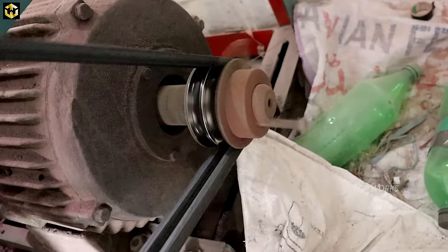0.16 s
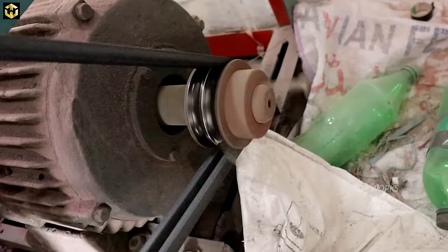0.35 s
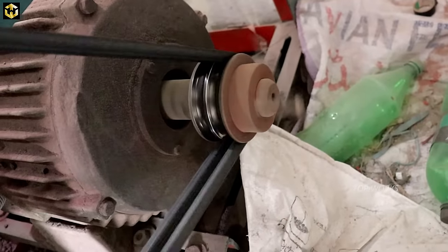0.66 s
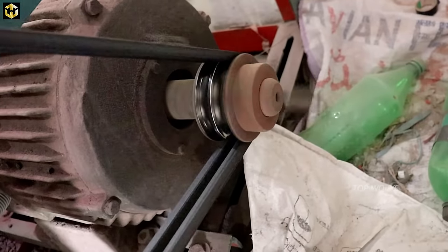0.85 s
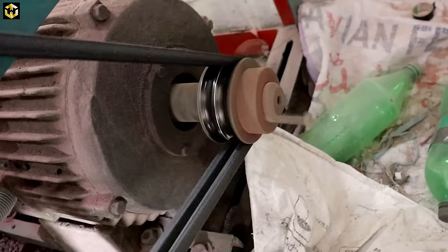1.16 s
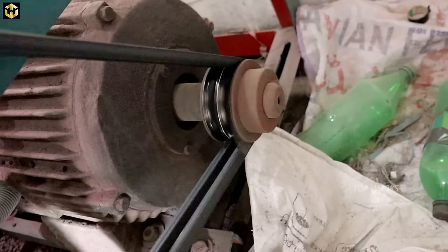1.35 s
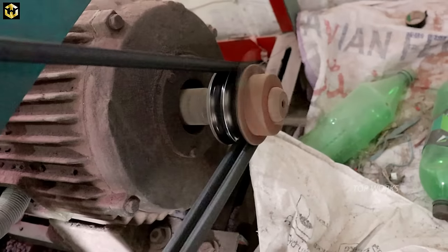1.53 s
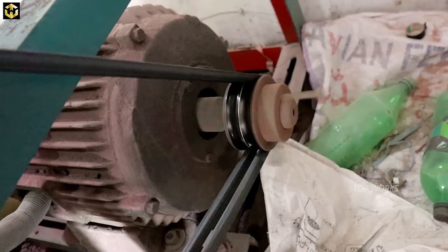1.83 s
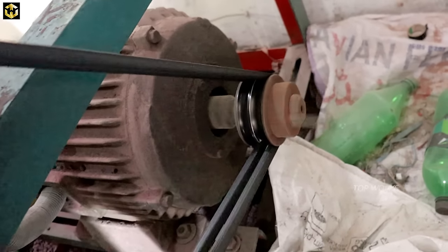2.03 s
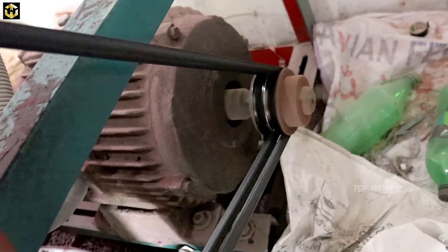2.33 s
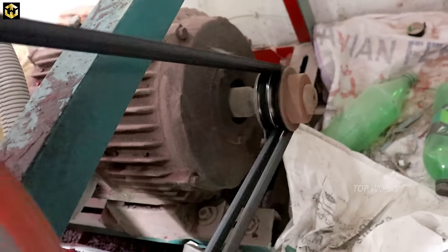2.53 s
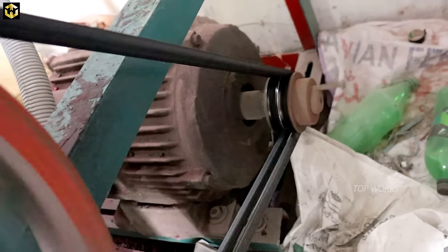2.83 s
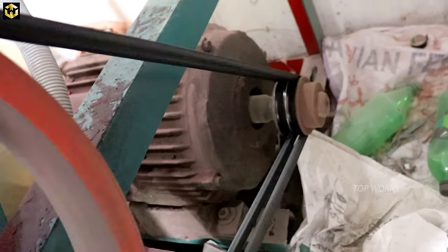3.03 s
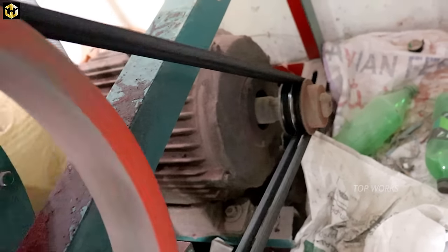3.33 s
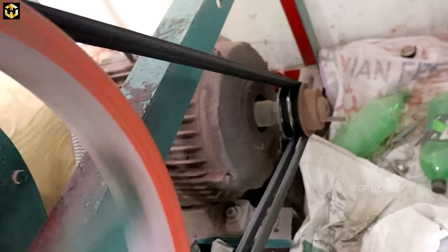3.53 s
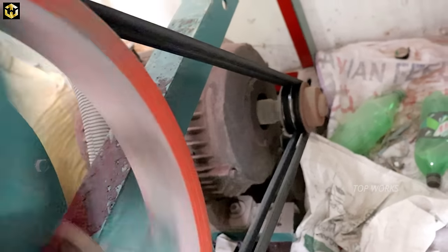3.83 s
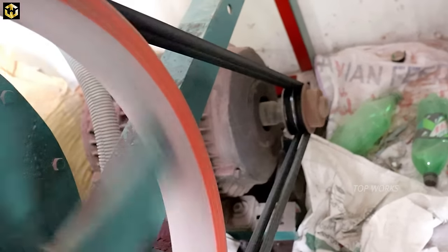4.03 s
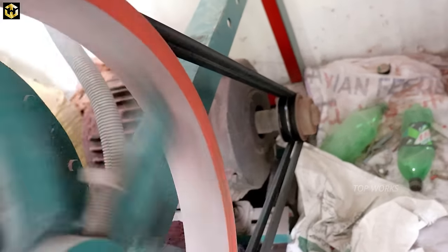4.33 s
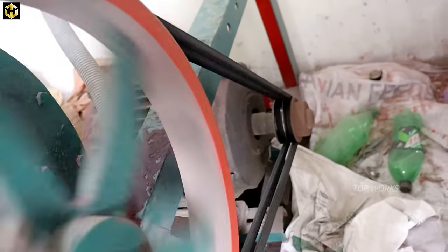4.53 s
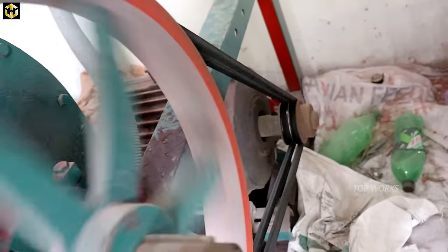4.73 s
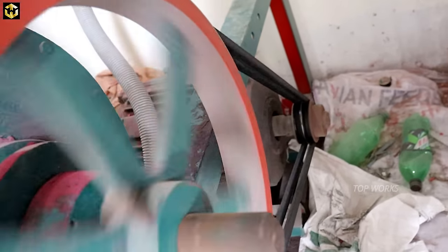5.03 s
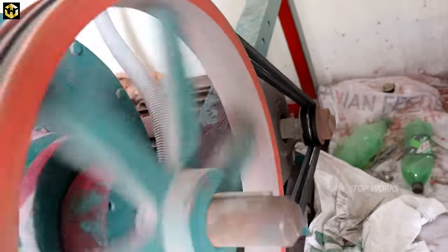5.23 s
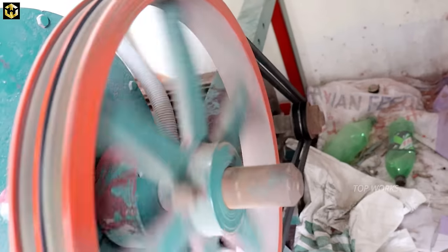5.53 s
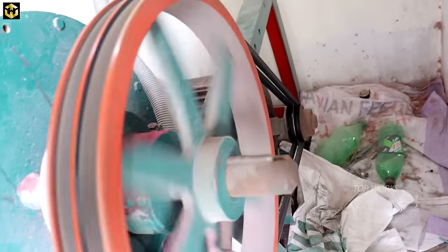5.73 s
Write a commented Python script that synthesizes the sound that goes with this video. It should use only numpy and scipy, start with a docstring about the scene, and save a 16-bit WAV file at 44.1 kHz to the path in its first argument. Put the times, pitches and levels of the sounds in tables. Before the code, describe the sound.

A belt-driven machine runs without pause in a workshop, heard close in wide stereo. It begins loud and throaty: deep throbbing around 80 Hz, low rumble and rushing noise, surging at about 0.3 s, with dull knocks at 0.2 and 0.65 s. A stuttering motor hum stands out near 1 s, then fades by 2.2 s, when a low note softly swells and passes. The din keeps sinking, leaving a faint hollow drone that dips about twice a second, a rough rush ringing near 1.2 kHz and steady rubber hiss. Treble sizzle with faint squeal swells on the left around 3.5 s. Short airy swishes glide up or down throughout, densest from 0.9 to 4 s. Light ticks are scattered between 0.7 and 4.6 s. Three quick dull knocks come at 4.1 s, a fainter one at 4.85 s. By the end the sound is thinner, quieter and centred, with a last swish at 5.8 s.

```python
"""Workshop: an electric motor drives a drum through V-belts; the din sinks over six seconds.
Frame: noise bands throb and rumble under sine hum and a resonant drone. Drum: noise through
housing resonances, roughened by small impacts. Belts: hiss and squealing sizzle.
Brief swishes: noise puffs through gliding resonances. Dull knocks excite low housing modes;
light ticks are decaying noise bursts; one low note swells."""
import sys
import numpy as np
from scipy import signal
from scipy.fft import rfft, irfft
from scipy.io import wavfile
from scipy.ndimage import uniform_filter1d

SR = 44100
rng = np.random.default_rng(int(sys.argv[2]) if len(sys.argv) > 2 else 0)


def wav_out(sig):
    """Save sig, one row per channel (or a flat mono array), as 16-bit PCM at SR to the path in sys.argv[1]."""
    wavfile.write(sys.argv[1], SR, np.round(np.clip(np.atleast_2d(sig).T, -1, 1) * 32767).astype(np.int16))


N = 259308
FRAME, HOP = 2048, 256  # samples
HZ = np.fft.rfftfreq(FRAME, 1 / SR)
FRAME_S = np.arange(N // HOP + 3) * HOP / SR
TIME = np.arange(N) / SR


def amp(db):
    """Decibels to gain."""
    return 10 ** (np.asarray(db) / 20)


def evened(x):
    """Scale to rms 1."""
    return x / np.sqrt(np.mean(x ** 2) + 1e-20)


def curve(table, t=TIME):
    """Join (time_s, value) rows by straight lines."""
    return np.interp(t, *np.transpose(table))


def bell(t, centre_s, length_s):
    """Smooth swell to 1 around centre_s."""
    return np.exp(-((t - centre_s) / length_s) ** 2)


def spectrum(points):
    """Join points on a log-frequency axis; hold the end values."""
    freq_hz, value = np.transpose(points)
    return np.interp(np.log(HZ + 1), np.log(freq_hz), value)


def band(points):
    """Spectrum in dB, falling 30 dB per octave beyond its ends."""
    outside_oct = abs(np.log2((HZ + 1) / np.clip(HZ + 1, points[0][0], points[-1][0])))
    return spectrum(points) - 30 * outside_oct


def blend(early, late):
    """Colour change in dB on the way from the motor to the big pulley."""
    share = np.clip((FRAME_S[:, None] - 1.2) / 2.8, 0, 1)
    return (1 - share) * band(early) + share * band(late)


def lift(resonances):
    """Bell-shaped peaks in dB."""
    return sum(db / (1 + (2 * (HZ - hz) / width_hz) ** 2) for hz, width_hz, db in resonances)


def resonate(x, hz, width_hz):
    """One-pole resonance of gain 1 whose centre follows hz."""
    turn = np.exp(2j * np.pi * np.cumsum(hz * np.ones(x.shape[-1])) / SR)
    r = np.exp(-np.pi * width_hz / SR)
    return 2 * (turn * signal.lfilter([1 - r], [1, -r], x / turn)).real


def panned(x, pan_db):
    """Share sound between left (positive pan_db) and right, keeping its power."""
    gains = np.array([amp(pan_db / 2), amp(-pan_db / 2)]).reshape(2, -1)
    return x * gains / np.sqrt(np.mean(gains ** 2, 0))


def wander(rate_hz):
    """Slow random curve of rms 1: noise low-passed near rate_hz."""
    f = np.fft.rfftfreq(N, 1 / SR)
    return evened(irfft(rfft(rng.standard_normal(N)) / (1 + (f / rate_hz) ** 4), N))


# left-right likeness of noise [freq_hz, likeness (0 to 1)]
LIKENESS = [(60, 0.97), (130, 0.89), (290, 0.71), (450, 0.36), (640, 0.24), (1400, 0.011), (15000, 0.0084)]


def noise(shape_db, patchy_db, ripple_db, size=20):
    """Stereo noise with drifting patches and a room ripple at each ear that shifts as the listener moves."""
    shape = (2, len(FRAME_S), len(HZ), 2)
    z = rng.standard_normal(shape, dtype=np.float32).view(np.complex64)[..., 0]
    same = np.clip(spectrum(LIKENESS), 0, 1)
    z[1] = same * z[0] + np.sqrt(1 - same ** 2) * z[1]

    patches = rng.standard_normal(z.shape, dtype=np.float32)
    patches += patches[::-1] * np.clip(same + 0.57, 0, 1)  # ears share most of each patch
    patches = uniform_filter1d(patches, size=12, axis=1, mode="wrap")
    patches = evened(uniform_filter1d(patches, size=size, axis=2, mode="wrap"))
    unrest = np.interp(FRAME_S, [.8, 2.6], [.7, 1.1])[:, None]  # loud din is more even

    turn_s = 4  # room peaks become dips
    here, there = rng.standard_normal((2, 2, 1, len(HZ))) * (1 - same)
    walk = np.pi * FRAME_S[:, None] / turn_s
    ripple = here * np.cos(walk) + there * np.sin(walk)

    z *= amp(shape_db + patchy_db * unrest * patches + ripple_db * ripple)
    sound = signal.istft(z.transpose(0, 2, 1), nperseg=FRAME, noverlap=FRAME - HOP)[1]
    return evened(sound[:, :N])


def rattle(rate_per_s, spread_db, decay_s=.005):
    """Envelope of many small uneven impacts over a steady floor: each starts at once and dies away."""
    hits = rng.random(N) < rate_per_s / SR
    blows = amp(spread_db * np.minimum(rng.exponential(1, N), 4)) * hits
    power = signal.lfilter([1], [1, -np.exp(-1 / (decay_s * SR))], blows ** 2)
    return evened(np.sqrt(power + power.mean()))


# din loudness; only its change from the first row acts [time_s, level_db]
DIN = [(0.0, -32.5), (0.28, -31), (.72, -33), (1.1, -35), (2.17, -38.5), (3.9, -42), (5.6, -44)]


def follow(start_db, db_per_din_db):
    """Gain of a layer that moves with the din."""
    din_db = curve(DIN)
    return amp(start_db + db_per_din_db * (din_db - din_db[0]))


# deep throb surges [centre_s, level_db, length_s]
SURGES = [(.17, -51, .09), (0.35, -47, 0.084), (0.963, -54, 0.073), (1.37, -61, .08), (1.853, -63, 0.061),
          (3.698, -69, 0.089), (4.13, -65, 0.067), (4.88, -67, 0.044)]


def throbbing(rest_db=-79):
    """Throb strength: sinks with the din to a steady tremble, surging now and then."""
    surges = sum((amp(db) * bell(TIME, s, length_s)) ** 2 for s, db, length_s in SURGES)
    return np.sqrt(follow(-57, 3.3) ** 2 + amp(rest_db) ** 2 + surges)


# frame throb spectrum [freq_hz, level_db]
THROB = [(30, -23), (46, -22), (58, -3), (73, 6.5), (88, 7), (109, 3.5), (122, -22)]


def throb():
    """Lowest frame noise, shaped by the throb strength."""
    return noise(band(THROB), patchy_db=0.0, ripple_db=1, size=3) * throbbing()


# frame rumble spectrum [freq_hz, level_db]
RUMBLE = [(130, -21.5), (160, 0), (186, -5), (215, -0.5), (270, 0.5), (330, 4.5), (445, -4), (490, 4),
          (580, 1.5), (700, -1)]


def rumble():
    """Low-mid frame noise at the centre."""
    return amp(-1) * panned(noise(band(RUMBLE), patchy_db=3.0, ripple_db=3, size=5), pan_db=0.0)


# motor hum partials, before the common level [freq_hz, level_db]
HUM = [(159, -17.5), (318, -7), (474, -17.5), (530, -17)]
# common hum level [time_s, level_db]
HUM_LEVEL = [(.8, -2.5), (.97, 4), (1.4, 1), (2.2, -7.5)]


def hum(stutter_db=3, stutter_hz=9, slip_cycles=.2):
    """Motor sines that stutter with the load: level wavers, phase slips."""
    turns_s = TIME + np.cumsum(0.0015 * wander(7.0)) / SR
    out = np.zeros(N)
    for hz, db in HUM:
        level = amp(db + stutter_db * wander(stutter_hz))
        cycles = hz * turns_s + slip_cycles * wander(stutter_hz) + rng.random()
        out += level * np.sin(2 * np.pi * cycles)
    return amp(curve(HUM_LEVEL)) * out


def slack(lap_s=.508, slack_at_s=2.53, length_s=.07, dip_db=-14):
    """Gain of the frame's tremble: drops as the belts slacken once in each lap."""
    lap = (TIME - slack_at_s + lap_s / 2) % lap_s
    return amp(dip_db * bell(lap, lap_s / 2, length_s))


def swish_surges(surge_db=-12, corner_hz=1080, length_s=0.065):
    """Rumble strength added around each swish, more for lower swishes."""
    power = 0
    for s, db, hz, _, _ in SWISHES:
        surge = amp(db + surge_db) / (1 + (hz / corner_hz) ** 4)
        power = power + (surge * bell(FRAME_S, s, length_s)) ** 2
    return np.interp(TIME, FRAME_S, np.sqrt(power))


def shaking(rest_db=-64):
    """Rumble strength: sinks with the din to a slackening tremble, rises around low swishes."""
    return np.sqrt(follow(-34.5, 2.91) ** 2 + (amp(rest_db) * slack()) ** 2 + swish_surges() ** 2)


def drone():
    """Two hollow housing notes of resonant noise, dropping out once in each belt lap."""
    low = evened(resonate(resonate(rng.standard_normal(N), 156.6, 34), 156.6, 34))
    high = evened(resonate(resonate(rng.standard_normal(N), 337, 27), 337, 27))
    level_db = np.interp(TIME, [2.1, 3.2], [-70, -64.5]) + 1.5 * wander(5.7)
    return (low + high) * amp(level_db) * slack()


def frame():
    """Throb, rumble and hum sink with a fast waver; the hum gives way to the drone."""
    body = (rumble() + hum()) * shaking()
    return (throb() + body) * amp(1.0 * wander(38)) + drone()


# drum rush spectra, first and last [freq_hz, level_db]
RUSH_EARLY = [(480, -22), (620, -6.5), (800, -2), (1050, -2.5), (1280, -5), (1420, -4), (1700, -1),
              (2150, -0.5), (2600, -6), (3600, -30)]
RUSH_LATE = [(480, -20), (620, -13), (950, -8), (1280, -5.5), (1420, -3.5), (1650, 0), (2100, -3.5),
             (2700, -8), (3600, -18)]
# housing resonances, lift before its moving share [freq_hz, width_hz, lift_db]
HOUSING = [(722.4, 49, 10.5), (830, 28, 9), (1010, 33, 2.5), (1233.4, 24, 20), (1292, 12, 13)]
# pan from left to middle, shared with the hiss [time_s, left_right_db]
PAN = [(2.8, 7), (4.6, 3.5), (5.88, 0.5)]


def drum(ring_unrest=.17):
    """Rushing rings the housing, each resonance coming and going alone; fine rattling roughens it."""
    ring_share = np.interp(FRAME_S, [1.8, 3.5], [.8, .45])
    ringing_db = 0
    for mode in HOUSING:
        share = ring_share + ring_unrest * np.interp(FRAME_S, TIME, wander(3.2))
        ringing_db = ringing_db + lift([mode]) * share[:, None]
    roar_db = (lift([(650, 770, 3.9)]) - 1.5) * bell(FRAME_S[:, None], 0, 0.46)  # throaty at first
    shape_db = blend(RUSH_EARLY, RUSH_LATE) + ringing_db + roar_db
    rush = noise(shape_db, patchy_db=1.9, ripple_db=3, size=10)
    rush *= rattle(rate_per_s=200, spread_db=1.7)
    return panned(rush, curve(PAN)) * follow(-28.5, 1.193)


# belt hiss spectra, first and last [freq_hz, level_db]
HISS_EARLY = [(2400, -7), (2900, 3.5), (4200, 1.5), (5400, -1), (6800, -9), (8300, -12)]
HISS_LATE = [(2400, -10.5), (2900, 0), (4200, -1), (5400, -1.5), (6800, -7), (8300, -13)]


def hiss():
    """Rubber friction on the pulleys: broad high noise."""
    rub = noise(blend(HISS_EARLY, HISS_LATE), patchy_db=1.5, ripple_db=2.8, size=30)
    return panned(rub * follow(-33.5, 0.83), curve(PAN) - 1.9)


# belt sizzle spectrum [freq_hz, level_db]
SIZZLE = [(6000, -0.5), (7200, -2.5), (10300, -3.5), (11500, -7), (15500, -12)]
# squeal resonances, lift before its moving share [freq_hz, width_hz, lift_db]
SQUEAL = [(7290, 410, 10.3), (8900, 320, 8.4), (10060, 420, 9.3), (10580, 380, 6.3)]


def sizzle(closest_s=3.52, length_s=1.06, swell_db=2):
    """Treble friction with faint squeal, swelling as the big pulley passes closest."""
    squeal_share = 0.17 + 0.67 * bell(FRAME_S[:, None], closest_s, length_s)
    treble = noise(band(SIZZLE) + squeal_share * lift(SQUEAL), patchy_db=3.0, ripple_db=1.8, size=24)
    near = bell(TIME, closest_s, length_s)
    treble *= follow(-41, 0.95) * amp(swell_db * near)
    return panned(treble, 4.7 + 4 * near)


def belts():
    """Hiss and sizzle roughened by one train of small impacts."""
    return (hiss() + sizzle()) * rattle(rate_per_s=300, spread_db=-0.3)


# brief dips of the running noise [centre_s, level_db, length_s]
LULLS = [(0.84, -1.5, 0.04), (2.232, -1.5, 0.067), (2.508, -0.5, 0.054), (3.045, -2.5, 0.057),
         (3.813, -1.5, 0.043), (4.366, -3.5, 0.0092), (5.6, -1.5, 0.06)]


def lulls():
    """Gain of frame, drum and belts, which dips briefly."""
    return amp(sum(db * bell(TIME, s, length_s) for s, db, length_s in LULLS))


# blows on the housing; thud is relative to the ring [start_s, level_db, thud_db]
KNOCKS = [(0.23, -24, -14), (0.645, -31, -5), (1.332, -43, 0), (4.066, -28, -25), (4.125, -35, -24),
          (4.19, -41.5, -11), (4.85, -47, -16)]
# housing modes [freq_hz, level_db, t60_s]
PANEL = [(159.8, 2, 0.12), (252, -17, 0.1), (340, -11, 0.12), (665, -18, .18)]


def knocks(swell_s=.02, thud_t60_s=.2):
    """Dull blows swell softly into decaying low housing modes over a short rough noise thud."""
    out = np.zeros(N)
    thud = evened(resonate(resonate(rng.standard_normal(N), 440, 330), 440, 330))
    for s, blow_db, thud_db in KNOCKS:
        t = np.maximum(TIME - s, 0)
        # phase runs on from blow to blow
        ring = sum(amp(db - 60 * t / t60_s) * np.sin(2 * np.pi * hz * TIME) for hz, db, t60_s in PANEL)
        rough = thud * amp(thud_db - 60 * t / thud_t60_s)
        swell = 1 - np.exp(-(t / swell_s) ** 2)
        out += amp(blow_db) * (ring + rough) * swell
    return out


# brief swishes [centre_s, level_db, pitch_hz, length_s, glide_oct_per_s]
SWISHES = [(0.307, -34, 760, 0.036, 4), (0.399, -28.5, 1050, 0.026, -11), (0.893, -32.5, 830, 0.035, 8),
           (1.144, -32, 1080, 0.055, -11), (1.246, -35, 690, 0.065, -11), (1.348, -38, 2110, 0.055, 2),
           (1.919, -36, 940, 0.055, -9), (2.089, -41.5, 2220, 0.091, 0), (2.359, -36.5, 970, 0.02, -5),
           (2.432, -43.5, 680, 0.043, 2), (2.615, -37, 1500, 0.035, 8), (2.861, -34, 1440, 0.064, -7.5),
           (2.929, -39, 870, 0.069, 3), (3.08, -39.5, 2000, 0.071, -1), (3.17, -38.5, 1060, 0.052, -5),
           (3.292, -40.5, 2110, 0.093, 5), (3.567, -39, 1800, 0.037, -9), (3.652, -40.5, 870, 0.059, 21),
           (3.724, -37, 1220, 0.056, 13), (3.87, -38, 1790, 0.034, -4), (4.08, -39, 1710, 0.027, 12),
           (4.265, -44, 1430, 0.054, 12), (4.623, -41, 1570, 0.025, -1), (4.624, -45, 5500, 0.08, 1),
           (4.867, -41.5, 5300, 0.063, -3), (5.036, -44, 724, 0.057, -7), (5.225, -38.5, 1260, 0.03, 2),
           (5.279, -45.5, 915, 0.073, -1), (5.343, -43.5, 2830, 0.026, 2), (5.429, -39, 1600, 0.023, -1),
           (5.814, -35, 1110, 0.062, -4)]


def swishes(width_share=0.81):
    """Soft puffs of noise through a gliding resonance, bass removed."""
    out = np.zeros((2, N))
    for s, db, hz, length_s, glide in SWISHES:
        near = abs(TIME - s) < 2 * abs(length_s)
        t = TIME[near] - s
        centre_hz = hz * 2 ** (glide * t)
        width_hz = min(width_share * hz, 950)
        puff = resonate(rng.standard_normal((2, len(t))), centre_hz, width_hz)
        puff = resonate(puff, centre_hz, width_hz)
        out[:, near] += evened(puff) * amp(db) * np.exp(-2 * (t / length_s) ** 2)
    no_bass = signal.butter(2, 350, "highpass", fs=SR, output="sos")
    return panned(signal.sosfilt(no_bass, out), pan_db=5.0)


def dying(events, t60_s):
    """Envelope of (start_s, level_db, ..) events that start at once and die away."""
    return sum(amp(db - 60 * np.maximum(TIME - s, 0) / t60_s) * (TIME >= s) for s, db, *_ in events)


# light ticks; snap is relative to the tick [start_s, level_db, snap_db]
TICKS = [(.664, -39.5, -11), (.779, -36, -16), (1.334, -42, -4), (2.338, -38, -8), (2.582, -39, -6),
         (3.219, -47, 9), (4.377, -41, -1), (4.586, -48, 2)]


def ticks(t60_s=0.5, snap_t60_s=.045):
    """Short bright noise snap, trailed by the room as slower-dying noise."""
    white = rng.standard_normal((2, N))
    tail_band = signal.butter(2, [900, 6000], "bandpass", fs=SR, output="sos")
    snap_band = signal.butter(2, [3500, 11500], "bandpass", fs=SR, output="sos")
    tail = evened(signal.sosfilt(tail_band, white))
    snap = evened(signal.sosfilt(snap_band, white))
    snaps = [(s, db + snap_db) for s, db, snap_db in TICKS]
    return panned(tail * dying(TICKS, t60_s) + snap * dying(snaps, snap_t60_s), pan_db=5)


def boom(centre_s=1.94, length_s=0.23, hz=108, level_db=-59):
    """The frame's low note swells once, as a sine with wavering phase."""
    tone = np.sin(2 * np.pi * (hz * TIME + 0.071 * wander(7.2)))
    return amp(level_db) * bell(TIME, centre_s, length_s) * tone


def scene():
    """Running machine, then knocks, swishes, ticks and the low note."""
    running = (frame() + drum() + belts()) * lulls()
    return running + knocks() + swishes() + ticks() + boom()


def record(dry):
    """Microphone bass roll-off and recorder band limit."""
    thin = signal.sosfilt(signal.butter(3, 46, "highpass", fs=SR, output="sos"), dry)
    band_limit = signal.firwin(1023, 15750, window=("kaiser", 9), fs=SR)
    return signal.oaconvolve(thin, band_limit[None], "same", axes=1)


dry = scene()
out = record(dry)
wav_out(out)
```